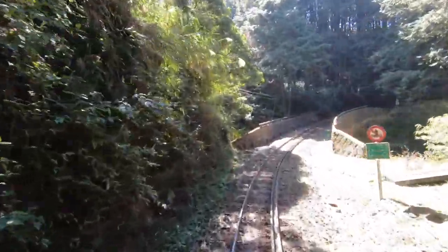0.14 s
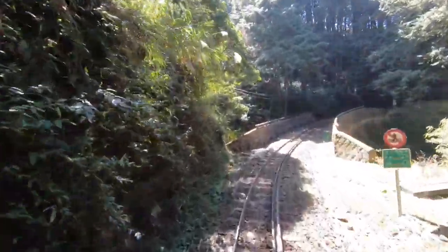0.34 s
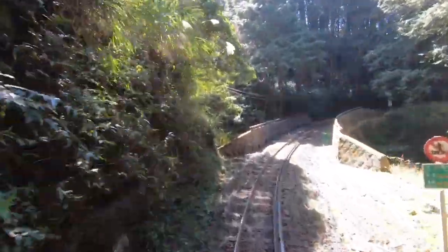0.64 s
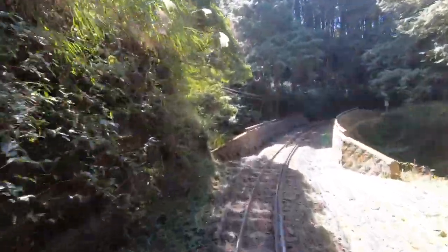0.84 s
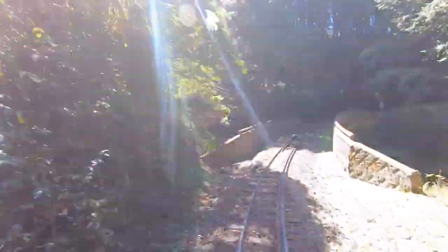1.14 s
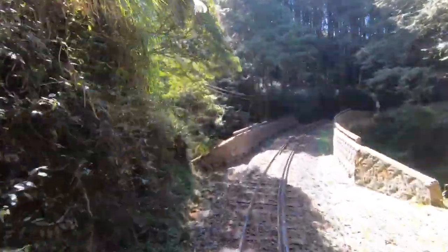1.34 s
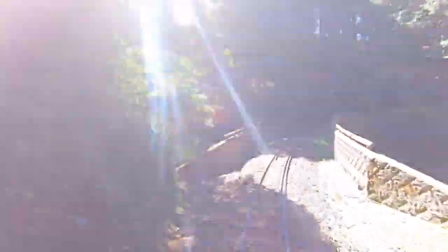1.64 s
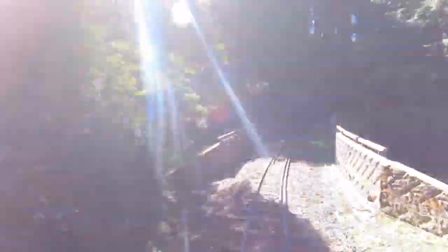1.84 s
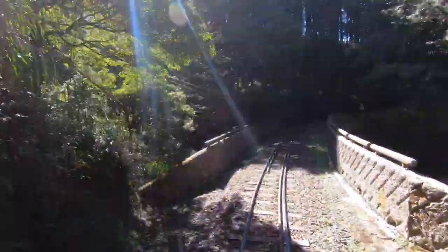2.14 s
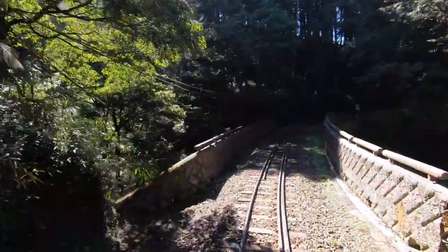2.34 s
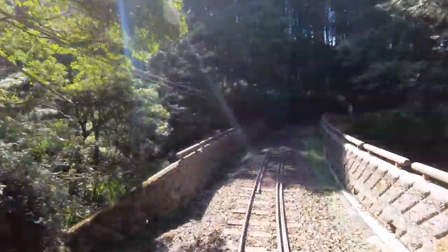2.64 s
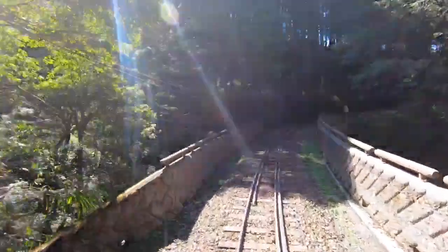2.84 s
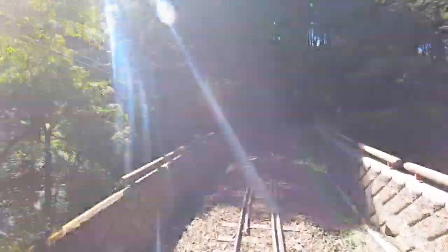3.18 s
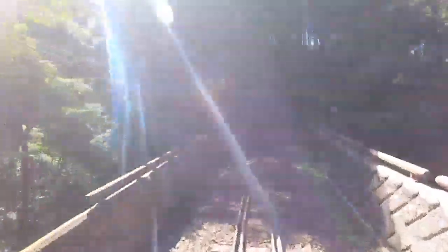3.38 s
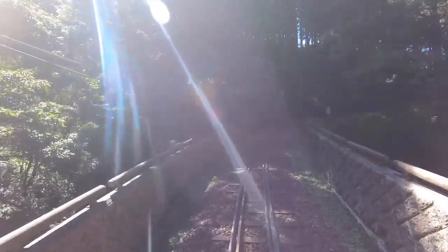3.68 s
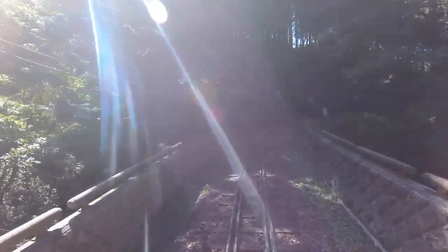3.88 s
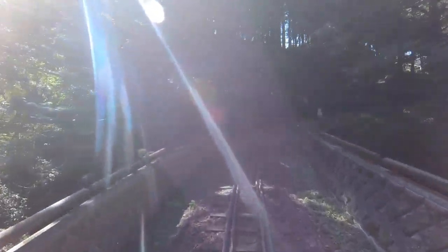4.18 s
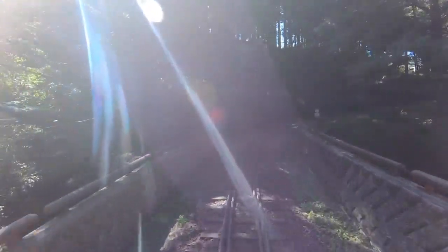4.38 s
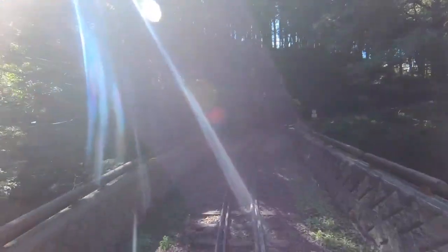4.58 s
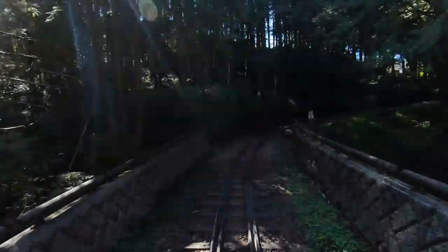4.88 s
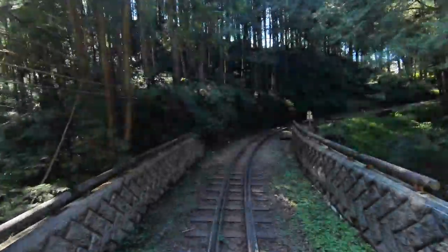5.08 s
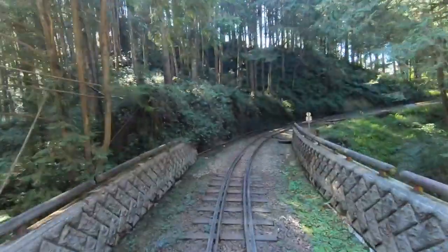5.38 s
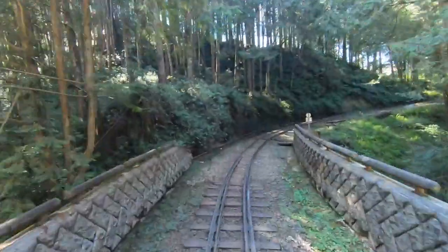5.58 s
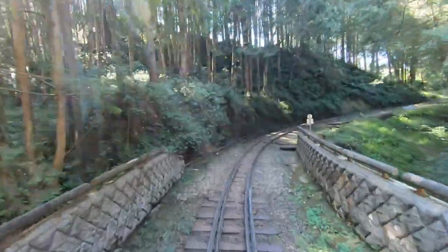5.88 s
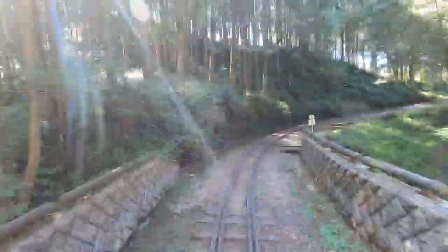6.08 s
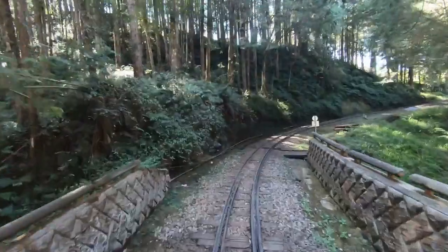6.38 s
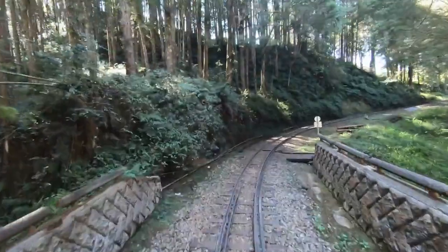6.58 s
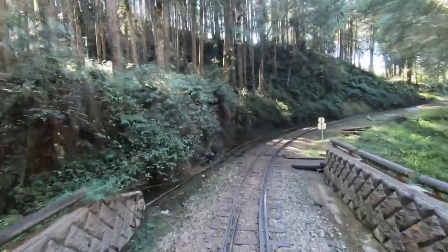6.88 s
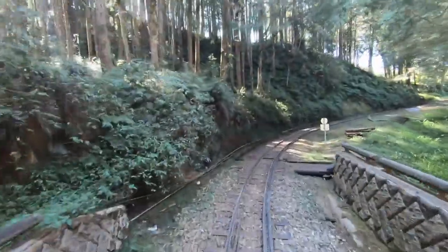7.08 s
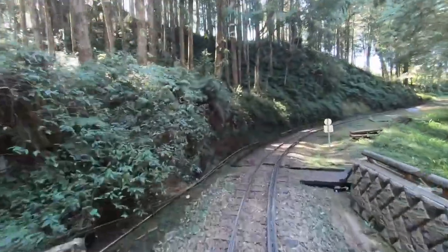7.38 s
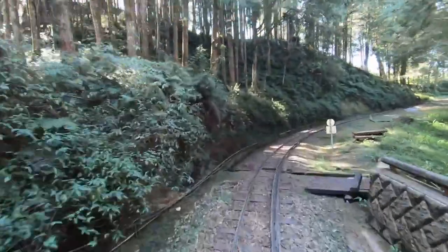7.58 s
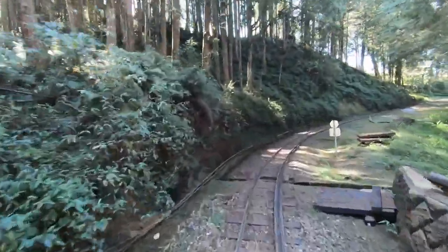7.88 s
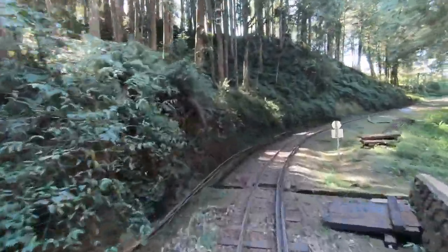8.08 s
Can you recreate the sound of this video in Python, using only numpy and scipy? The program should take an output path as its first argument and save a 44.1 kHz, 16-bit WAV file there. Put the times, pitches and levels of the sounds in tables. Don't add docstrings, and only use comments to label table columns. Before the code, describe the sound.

A small diesel railcar heard from inside its cab: a loud, smooth low engine boom with soft hiss and a faint airy turbo whistle. Rough rolling rumbles through floor and panels. Dull joint knocks and tiny metallic ticks come irregularly. The boom dips repeatedly around three to four seconds while rolling thins, then the engine pulls slightly higher and wheels growl in the curve. One close, small microphone, dulled on top.

```python
import sys
import numpy as np
from scipy import signal
from scipy.fft import rfft, irfft, next_fast_len
from scipy.io import wavfile
from scipy.ndimage import uniform_filter1d

SR = 44100
rng = np.random.default_rng(int(sys.argv[2]) if len(sys.argv) > 2 else 0)


def digitize_waveform(pressure):
    field = np.atleast_2d(pressure).T
    bounded = np.clip(field, -1, 1)
    quanta = np.round(bounded * 32767).astype(np.int16)
    wavfile.write(sys.argv[1], SR, quanta)


def volts_from_decibels(level):
    exponent = np.asarray(level, float) / 20
    return 10 ** exponent


N = 362943
TIME_S = np.arange(N) / SR
FFT_SIZE = next_fast_len(N)
FFT_HZ = np.fft.rfftfreq(FFT_SIZE, 1 / SR)

# t/s, f/Hz
FIRING_RATE = [
    (0, 95.0),
    (3.4, 95.3),
    (4.4, 95.9),
    (5.1, 97.2),
    (8.23, 97.3),
]
# t/s, length/s, change/dB
OPENINGS = [(.3, 0.24, -2.5), (.65, 0.36, -2.5), (1.1, 0.2, -2.5), (2.35, 0.16, -2), (2.58, 0.72, 1.2),
            (3.1, 0.593, -5), (3.24, 0.47, -3.5), (3.66, 0.68, -5.5), (4.22, .32, -2.5), (5.0, .3, -1),
            (6.0, 0.29, -1), (6.45, 0.26, -1), (7.2, 0.18, -2.5)]
# t/s, length/s, level/dB
OCTAVE_LOCKS = [(0, 0.17, -37), (.58, 0.39, -25.5), (1.8, 0.23, -33), (3.0, .25, -35.5),
                (3.25, 0.39, -36.5), (3.88, .38, -24.5), (5.25, 0.96, -28), (6.12, 0.41, -27.5),
                (6.6, 0.41, -26.5), (7.05, 0.23, -31.5), (7.5, 0.41, -29), (7.95, 0.36, -27)]
# t/s, level/dB
EFFORT = [
    (0, -49.5),
    (1.05, -44.5),
    (1.6, -47.5),
    (2.5, -47),
    (3.05, -48.5),
    (3.5, -46.5),
    (4.3, -43),
    (5.2, -46),
    (8.23, -46.5),
]
# f/Hz, level/dB
BLOCK = [(290, -3), (400, 8), (520, -0.5), (900, 2), (1450, -3), (1560, -2), (1650, 0), (1800, -4.5),
         (2200, -8), (3500, -15), (4300, -19.5), (5500, -26.5), (7000, -41)]
# f/Hz, level/dB
INTAKE = [(4000, -13), (5500, -6), (7000, 3), (8500, 2.5), (9600, -1.5), (10300, -16), (11500, -21),
          (14000, -35.5)]

# t/s, level/dB
TRACK = [(0, -36), (.5, -33.5), (.92, -33.5), (1.3, -30.5), (2.0, -33.5), (2.45, -33), (3.05, -43.5),
         (3.8, -40.5), (4.12, -32), (4.33, -34), (4.5, -37.5), (5.1, -41.5), (5.7, -34.5), (6.0, -37.5),
         (6.5, -34.5), (7.0, -35), (7.4, -35), (8.23, -34)]
# f/Hz, level/dB
SWAY = [(10, -6.5), (25, -3.5), (45, 2), (70, 2), (90, -5), (110, -10), (140, -26.5)]
# f/Hz, level/dB
DECK = [(75, -24), (95, -4.5), (120, 0.5), (160, -0.5), (190, -5.5), (222, -3.5), (240, -9.5), (280, -28.5)]
# f/Hz, level/dB
FLOOR = [(200, -25.5), (240, -2), (260, -0.5), (300, 0.5), (325, -1.5), (350, -13), (450, -22.5)]
# f/Hz, level/dB
RAIL = [(250, -17), (370, 2), (530, 0.5), (700, -0.5), (950, -9), (1300, -15), (2000, -26.5), (3000, -43)]
# f/Hz, level/dB
FLANGE = [(9800, -25), (10400, -9), (10900, 0), (12500, -4), (13500, -10), (16000, -20)]
# f/Hz, width/Hz, level re roar/dB
PANELS = [
    (530, 16, -10.5),
    (698.6, 40, -14.5),
    (948, 30, -21),
]
# t/s, length/s, change/dB
SETTLES = [
    (0, 0.43, -1.5),
    (.55, .4, 0),
    (1.3, 0.18, -0.5),
    (2.35, 0.69, -2),
    (3.75, .55, 4),
    (4.4, 0.7, -1),
    (5.75, 0.48, 2.5),
    (6.3, .7, 0),
    (7.55, .2, 2.5),
    (7.95, .28, 1.5),
]
# t/s, length/s, change/dB
SLEEPERS = [
    (.12, 0.15, -4),
    (.28, 0.15, 2.5),
    (1.3, 0.84, -3),
    (2.05, 0.59, 2.5),
    (2.6, 0.27, 3),
    (3.9, 0.22, -0.5),
    (4.36, 0.45, -3),
    (5.6, 0.21, 3.5),
    (6.55, 0.62, -2.5),
    (7.7, 0.63, 3),
]
# t/s, length/s, level/dB
BINDS = [
    (4.05, .38, -42),
    (6.15, .4, -38.5),
    (6.7, .48, -36.5),
    (7.05, .32, -37),
]

# t/s, peak/dB, centre f/Hz, ring/s
KNOCKS = [(0.86, -22.5, 1270, 0.037), (1.179, -25.5, 980, 0.095), (1.409, -36, 1110, 0.06),
          (1.979, -26, 970, 0.06), (2.375, -37, 1020, 0.048), (3.131, -31, 1200, 0.06),
          (4.074, -24.5, 1370, 0.069), (4.211, -31, 1260, 0.048), (4.874, -24.5, 1130, 0.037),
          (5.403, -23.5, 1060, 0.091), (6.489, -28, 1400, 0.056), (7.02, -37, 991, 0.054),
          (7.407, -33, 1610, 0.068), (7.649, -23, 1110, 0.03), (7.694, -27, 1140, 0.06)]
# t/s, f/Hz, peak/dB, t60/s
RINGS = [(.859, 668, -26, .1), (.86, 1250, -30, .05), (.86, 2200, -39, .03), (.872, 2060, -40, .12),
         (.868, 3560, -53, .06), (1.975, 1380, -44, .2), (1.974, 1860, -42, .2), (1.99, 2050, -41.5, 0.16),
         (4.074, 517, -17, 0.073), (4.075, 930, -23, 0.037), (4.075, 1464, -26.5, 0.067),
         (4.071, 1200, -31, .05), (5.404, 1193, -36, 0.092), (5.405, 1960, -41, .1),
         (5.41, 590, -28.5, 0.11), (5.415, 938, -29.5, 0.077), (7.648, 1110, -30.5, 0.091),
         (7.648, 830, -25.5, .03), (7.695, 2440, -45, 0.076)]
# t/s, peak/dB, centre f/Hz, ring/s
TICKS = [(0.866, -40, 2930, 0.06), (1.9693, -43, 2920, 0.13), (2.3552, -38.5, 3380, 0.065),
         (2.4797, -38.5, 3550, 0.082), (2.7245, -40.5, 3560, 0.084), (3.3255, -41.5, 3550, 0.07),
         (3.4222, -40, 2950, 0.034), (3.5194, -41, 3120, 0.081), (4.0741, -49, 3407, 0.063),
         (4.6674, -41.5, 3670, 0.095), (4.9141, -41, 3365, 0.063), (5.0318, -43.5, 3637, 0.061),
         (5.405, -36.5, 2940, 0.085), (5.692, -37, 2927, 0.07), (5.8471, -45.5, 3410, 0.082),
         (6.879, -41, 3100, 0.08)]
# t/s, length/s, f/Hz, level/dB
SQUEAKS = [
    (3.222, 0.045, 3540, -55),
    (3.233, 0.055, 2075, -48),
    (3.284, .035, 3500, -56),
    (3.3, 0.026, 2070, -49),
    (3.32, .05, 2070, -47),
    (3.325, .035, 3560, -60),
    (4.25, 0.15, 530, -30.5),
    (6.583, 0.03, 513, -30),
    (6.638, 0.027, 532, -29),
]
# t/s, length/s, centre f/Hz, level/dB
PUFFS = [(1.738, .085, 8700, -62.5), (2.355, .025, 7800, -66), (2.481, 0.028, 7200, -66),
         (2.726, 0.033, 7240, -69), (3.317, 0.067, 7800, -60.5), (3.502, 0.12, 7000, -61.5),
         (4.067, .03, 8300, -58), (4.377, .05, 8000, -66), (4.67, 0.036, 7500, -70),
         (5.41, 0.037, 7000, -72), (6.88, 0.035, 7500, -66)]
# t/s, length/s, level/dB
GAIN_STEPS = [
    (2.843, .072, -55),
    (3.89, .06, -63),
    (4.39, .05, -62),
    (4.64, .06, -59),
    (4.74, .065, -58),
]


def unit(x):
    return x / np.sqrt(np.mean(x ** 2))


def curve(table):
    s, values = np.transpose(table)
    return np.interp(TIME_S, s, values)


def walk(rate_hz):
    hold = int(SR / rate_hz)
    steps = np.repeat(rng.standard_normal(N // hold + 1), hold)
    return unit(uniform_filter1d(uniform_filter1d(steps, hold), hold)[:N])


def coloured(colour, flicker_db, rate_hz):
    hz, db = np.transpose(colour)
    log_hz = np.log(np.maximum(FFT_HZ, 1))
    gain = volts_from_decibels(np.interp(log_hz, np.log(hz), db, left=-90, right=-90))
    spectrum = rfft(rng.standard_normal(FFT_SIZE)) * gain
    place = np.interp(log_hz, np.log(hz[[1, -2]]), [0, 2])
    out = np.zeros(N)
    for k in range(3):
        share = np.clip(1 - abs(place - k), 0, 1)
        out += irfft(spectrum * share, FFT_SIZE)[:N] * volts_from_decibels(flicker_db * walk(rate_hz))
    return unit(out)


def band(x, hz, width_hz):
    return signal.lfilter(*signal.iirpeak(hz, hz / width_hz, fs=SR), x)


def mode_noise(hz, width_hz):
    noise = rng.standard_normal(N)
    return unit(band(band(noise, hz, 2.4 * width_hz), hz, 2.4 * width_hz))


def add(out, s, sound):
    i = int(s * SR)
    out[i:i + len(sound)] += sound[:N - i]


def swell(length_s):
    return signal.windows.tukey(int(length_s * SR), .5)


def passing(table, gain):
    out = np.zeros(N)
    for s, length_s, db in table:
        add(out, s, gain(db) * swell(length_s))
    return out


def boom():
    start_turns, tone_db, octave_db = 0.498, -14.5, -42.5
    wander_rad = 0.066 * walk(11) + .5 * walk(3)
    turns = np.cumsum(curve(FIRING_RATE)) / SR + start_turns
    phase = 2 * np.pi * turns + wander_rad - wander_rad[0]
    tone = volts_from_decibels(tone_db + passing(OPENINGS, float) + 0.43 * walk(22))
    octave = (volts_from_decibels(octave_db) + passing(OCTAVE_LOCKS, volts_from_decibels)) * volts_from_decibels(2.2 * walk(14))
    return np.sqrt(2) * (tone * np.cos(phase) + octave * np.cos(2 * phase))


def engine():
    block_db, firing_hz = curve(EFFORT), curve(FIRING_RATE)
    mean_block_db, intake_db_per_db, turbo_lag_s = -47, 1.1, .15
    intake_db = -63 + intake_db_per_db * (block_db - mean_block_db)
    speed_ratio = np.interp(TIME_S - turbo_lag_s, TIME_S, firing_hz) / firing_hz.min()
    turbo_hz = 8240 * speed_ratio ** 1.6
    breath = signal.lfilter(*signal.butter(2, 120, fs=SR), rng.standard_normal(N))
    turbo = unit(breath * np.sin(2 * np.pi * np.cumsum(turbo_hz) / SR))
    air = volts_from_decibels(-4.5) * coloured(INTAKE, 0.86, 15) + volts_from_decibels(-9.0) * turbo
    return volts_from_decibels(block_db + 3.5) * coloured(BLOCK, 0.53, 11) + volts_from_decibels(intake_db) * air


def rolling():
    rail_db = curve(TRACK)
    rough_db = rail_db + 36
    sway_db = -25 + 0.072 * rough_db
    deck_db = -24.5 + 0.48 * rough_db + passing(SETTLES, float)
    floor_db = -32.5 + 0.92 * rough_db + passing(SLEEPERS, float)
    sway = volts_from_decibels(sway_db) * coloured(SWAY, 0.99, 8)
    deck = volts_from_decibels(deck_db) * coloured(DECK, .6, 7.8)
    floor = volts_from_decibels(floor_db) * coloured(FLOOR, 0.83, 5.4)
    panels = sum(volts_from_decibels(db + 3.7 * walk(9)) * mode_noise(hz, width_hz) for hz, width_hz, db in PANELS)
    flange = volts_from_decibels(-48) * coloured(FLANGE, 1.5, 15)
    roar = coloured(RAIL, 1.3, 14) + panels + flange
    return sway + deck + floor + volts_from_decibels(rail_db - 2.5) * roar


def hits(table, spread, crack, trim_db):
    out, t = np.zeros(N), TIME_S[:SR // 4]
    for s, db, hz, ring_s in table:
        noise = rng.standard_normal(len(t))
        modes = unit(band(band(noise, hz, spread * hz), hz, 4.3 * spread * hz))
        decay = (1 - np.exp(-t / 0.0013)) * volts_from_decibels(-20 * t / ring_s)
        strike = np.sin(2 * np.pi * hz * t) * np.exp(-t / .0015)
        add(out, s, volts_from_decibels(db + trim_db) * (crack * strike + modes * decay))
    return out


def rings():
    out, t = np.zeros(N), TIME_S[:SR // 4]
    for s, hz, db, t60_s in RINGS:
        onset = 1 - np.exp(-t / 0.00056)
        add(out, s, volts_from_decibels(db - 60 * t / t60_s) * np.sin(2 * np.pi * hz * t) * onset)
    return out


def joints():
    blows = hits(KNOCKS, spread=0.49, crack=.45, trim_db=-11.5) + rings()
    return signal.lfilter(*signal.butter(2, 3800, fs=SR), blows)


def couplings():
    return hits(TICKS, spread=0.24, crack=.15, trim_db=-9.5)


def squeaks():
    out = np.zeros(N)
    for s, length_s, hz, db in SQUEAKS:
        shape = swell(length_s)
        add(out, s, volts_from_decibels(db) * shape * np.sin(2 * np.pi * hz * TIME_S[:len(shape)]))
    return out * volts_from_decibels(2.5 * walk(120))


def valves():
    out = np.zeros(N)
    for s, length_s, hz, db in PUFFS:
        shape = swell(length_s)
        puff = unit(band(band(rng.standard_normal(SR // 4), hz, 4000), hz, 4000))
        add(out, s, volts_from_decibels(db) * shape * puff[-len(shape):])
    return out


def growl():
    return passing(BINDS, volts_from_decibels) * volts_from_decibels(1.2 * walk(25)) * mode_noise(602, 128)


def cab_air():
    return volts_from_decibels(-45 + 1.1 * walk(3.6)) * mode_noise(360, 80)


def scene():
    train = boom() + engine() + rolling()
    gear = joints() + couplings() + squeaks() + valves()
    return (train + gear + growl() + cab_air())[None]


def gain_ticks():
    step_hz = 187.5
    steps = np.diff(np.floor(TIME_S * step_hz), prepend=0)
    return np.diff(passing(GAIN_STEPS, volts_from_decibels) * steps, prepend=0)


def low_pass(x):
    return signal.sosfilt(signal.butter(12, 15600, fs=SR, output="sos"), x)


def record(dry):
    soft = 0.74 * np.tanh(dry / 0.74) * volts_from_decibels(1.28)
    dull = signal.sosfilt(signal.butter(3, 10500, fs=SR, output="sos"), soft)
    return low_pass(dull + gain_ticks())


dry = scene()
out = record(dry)
digitize_waveform(out)
```